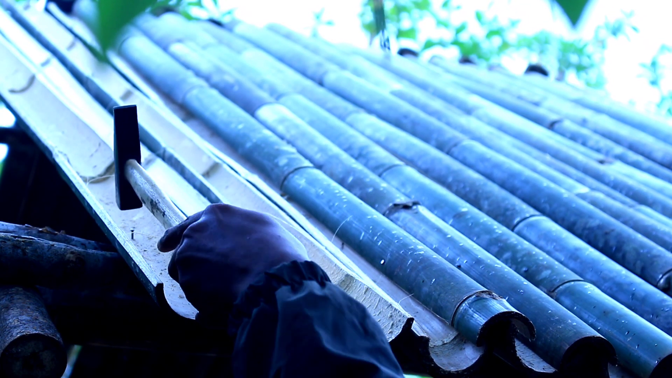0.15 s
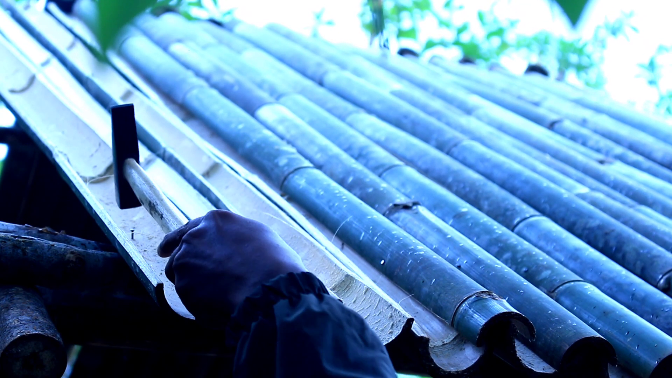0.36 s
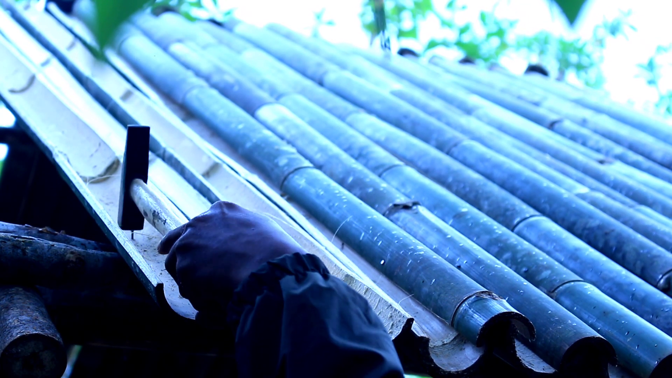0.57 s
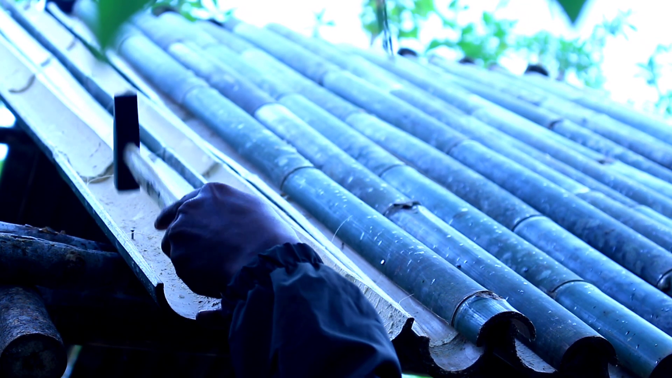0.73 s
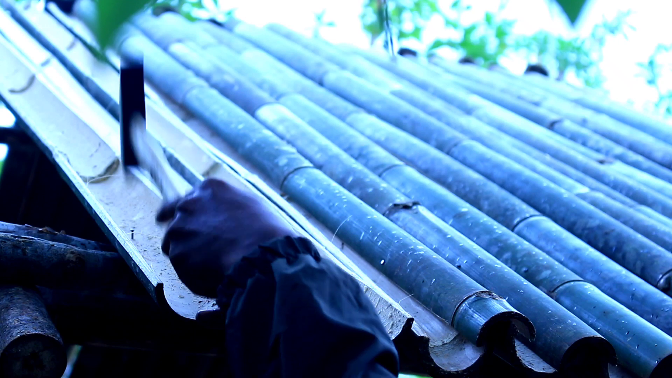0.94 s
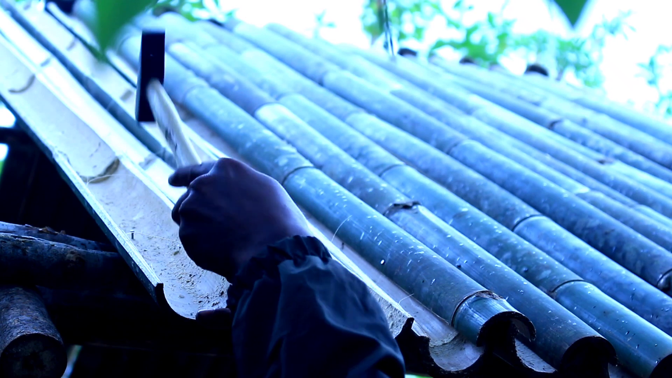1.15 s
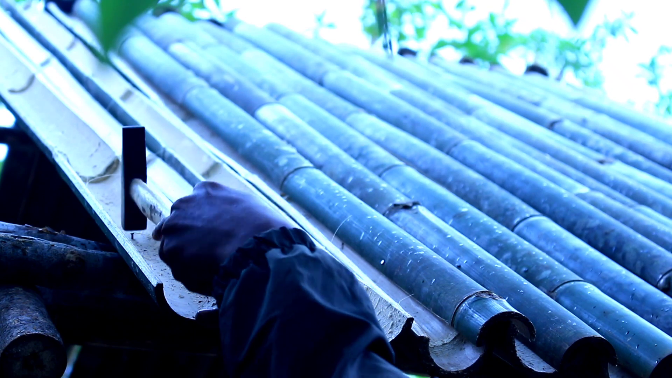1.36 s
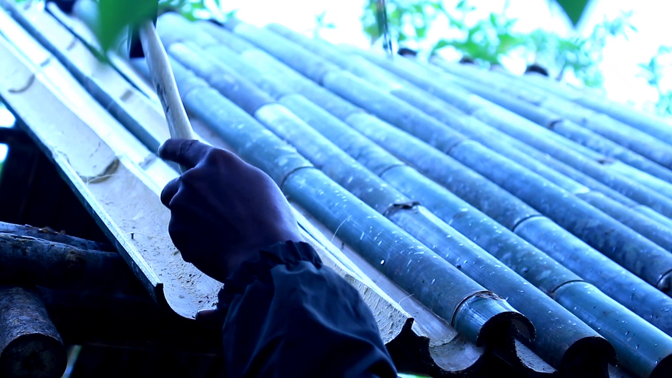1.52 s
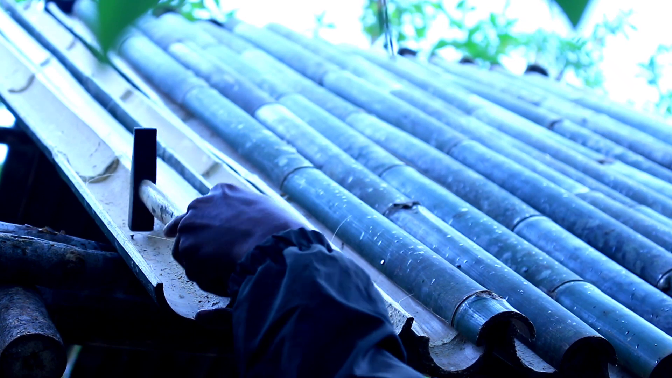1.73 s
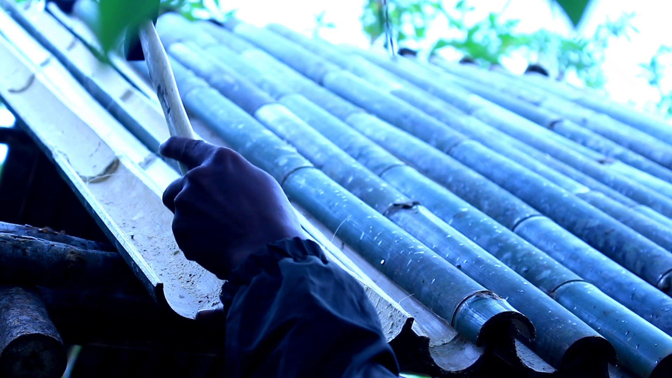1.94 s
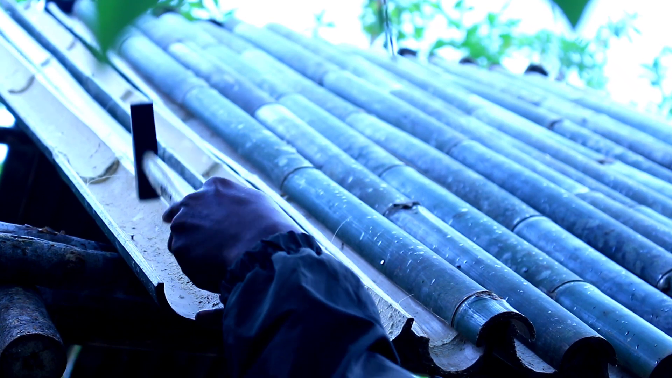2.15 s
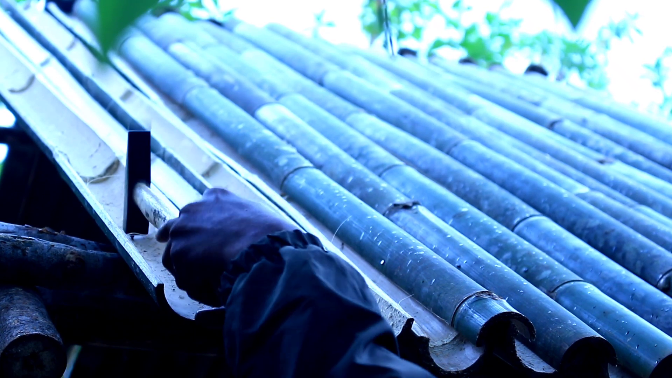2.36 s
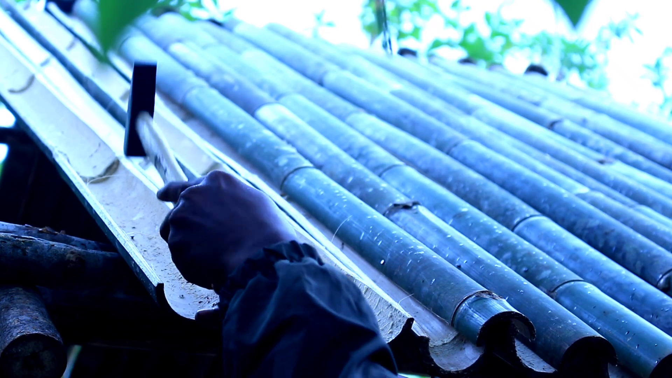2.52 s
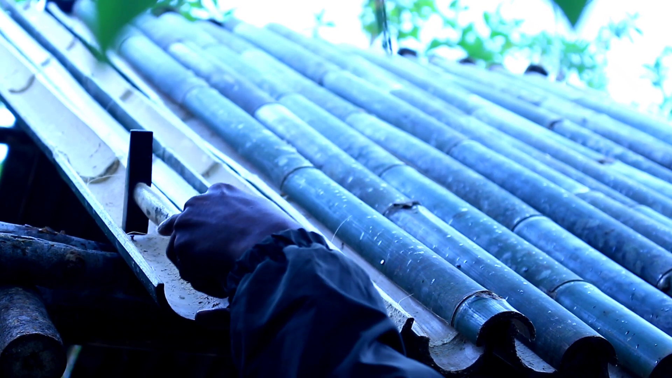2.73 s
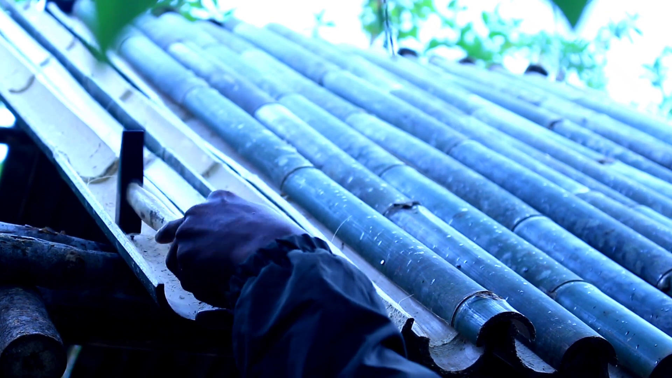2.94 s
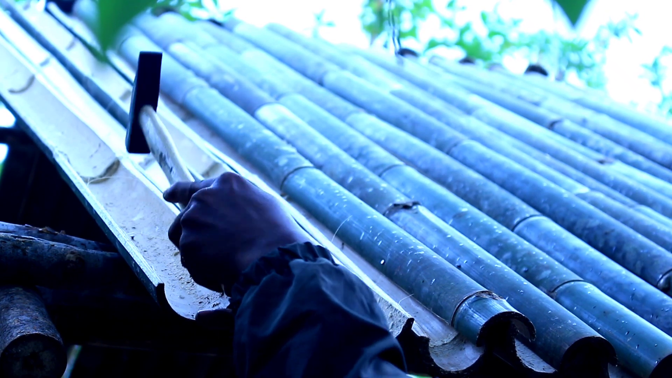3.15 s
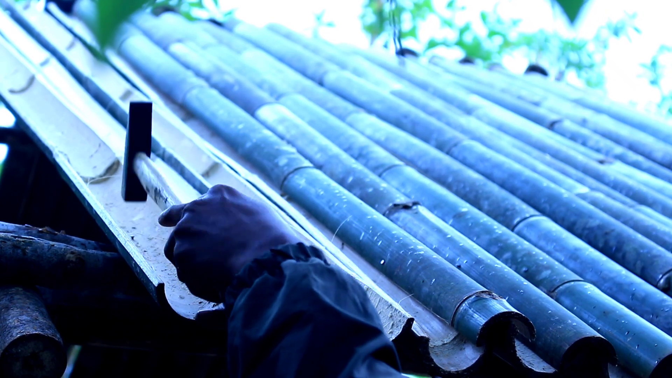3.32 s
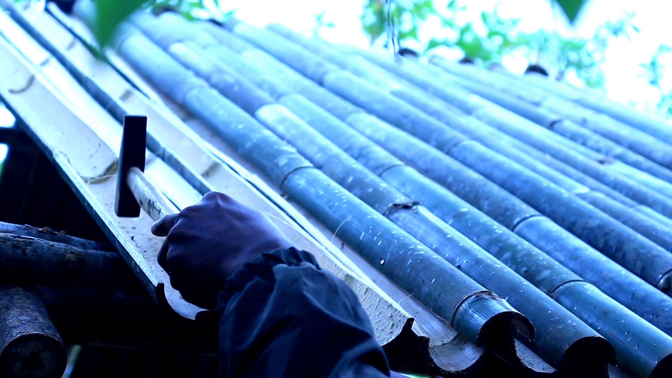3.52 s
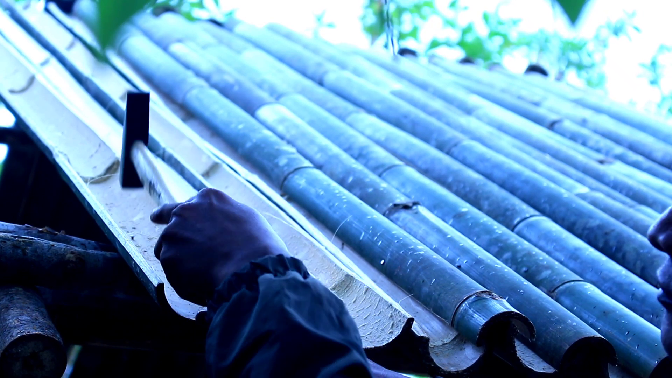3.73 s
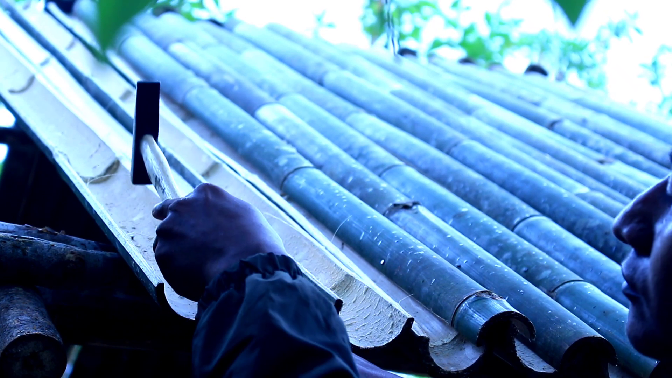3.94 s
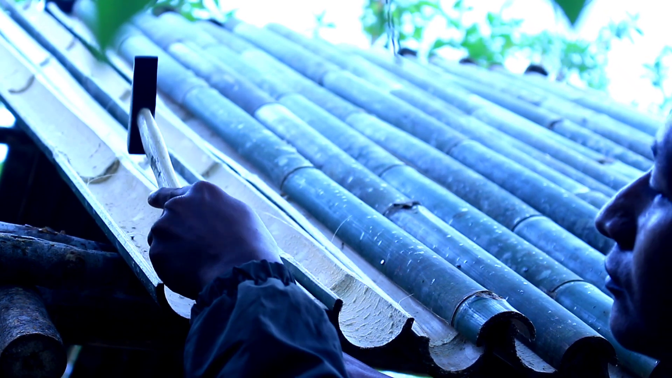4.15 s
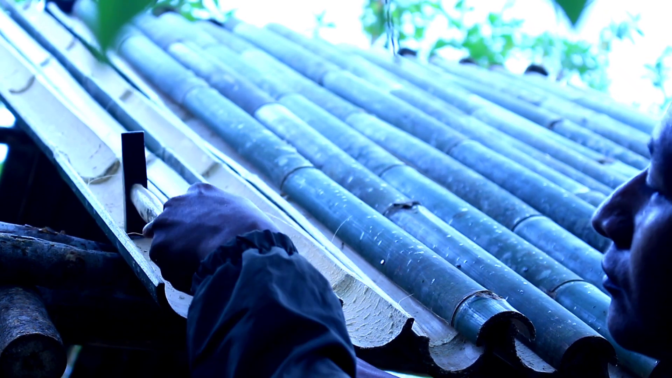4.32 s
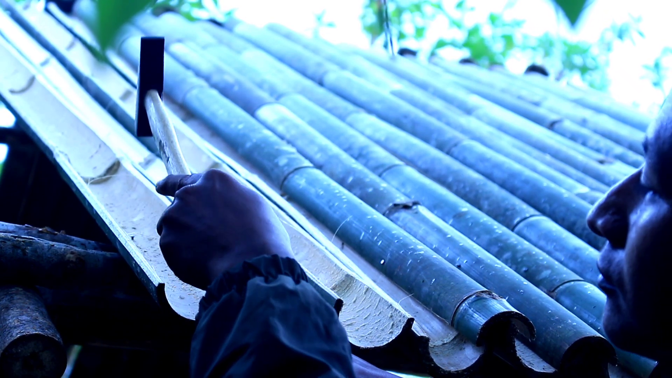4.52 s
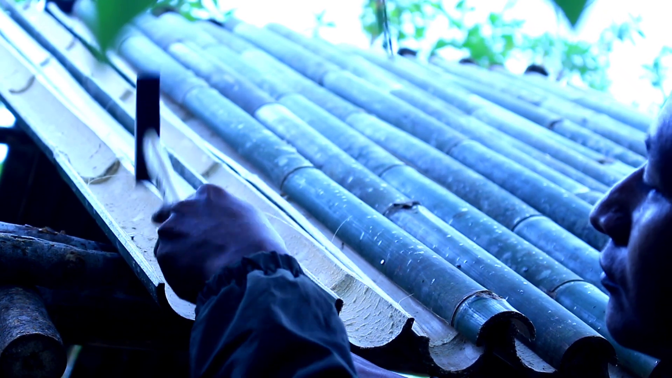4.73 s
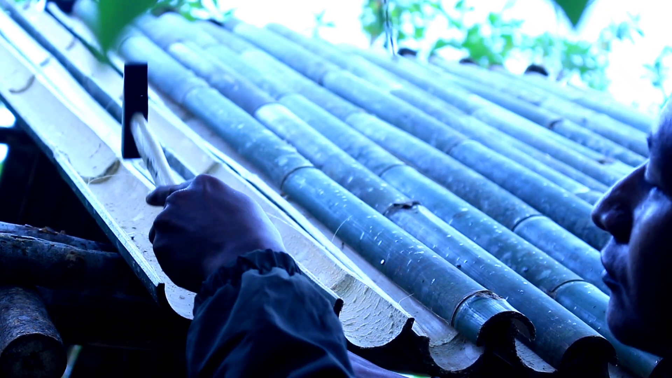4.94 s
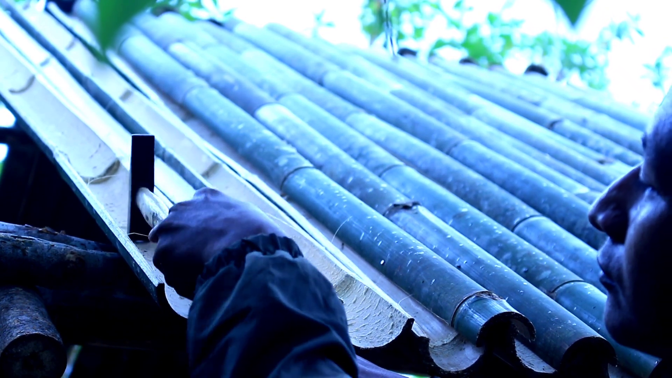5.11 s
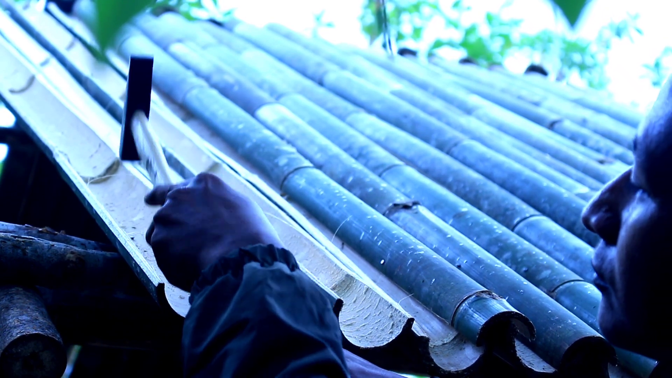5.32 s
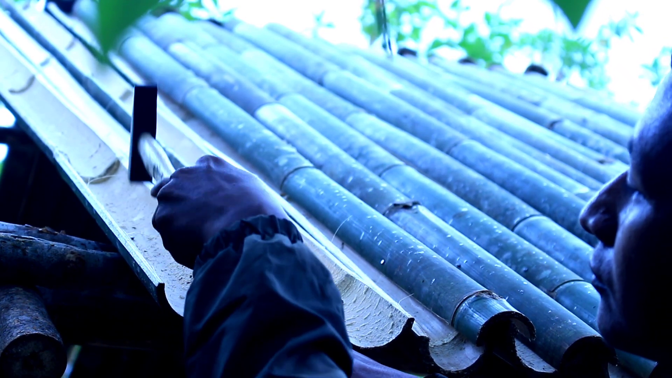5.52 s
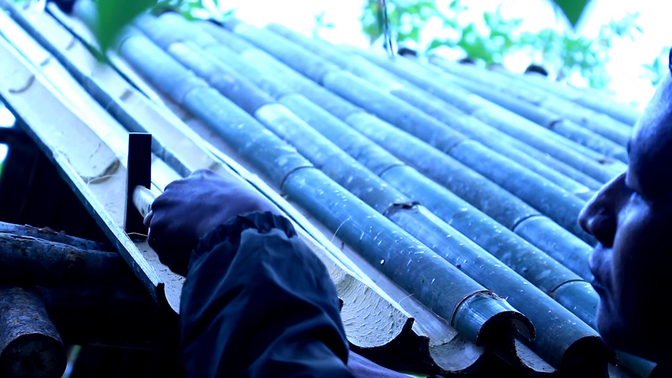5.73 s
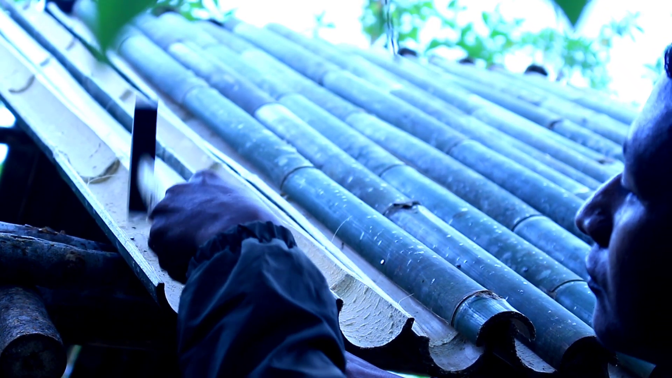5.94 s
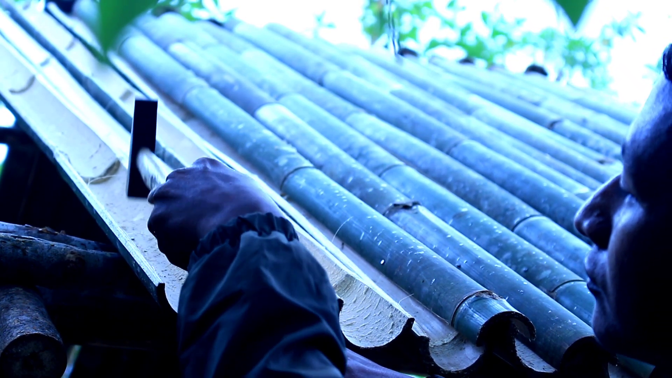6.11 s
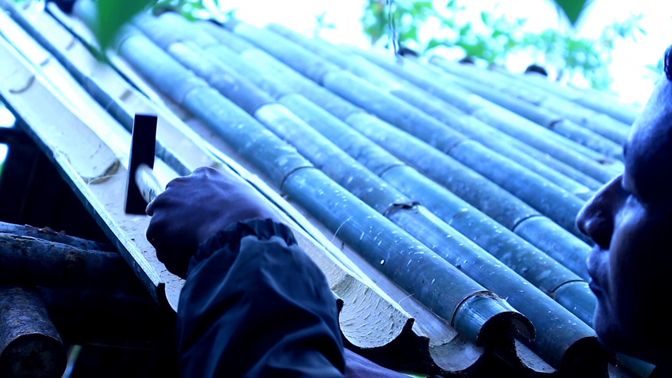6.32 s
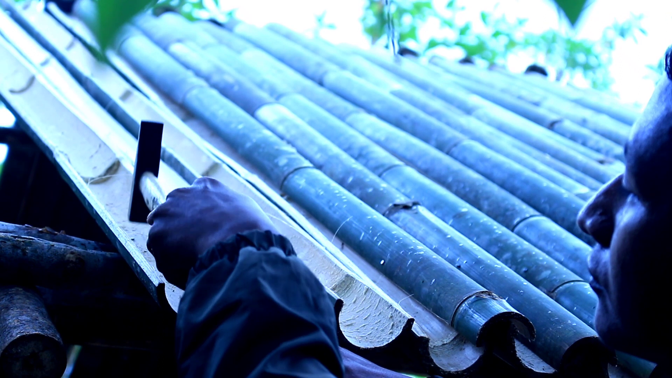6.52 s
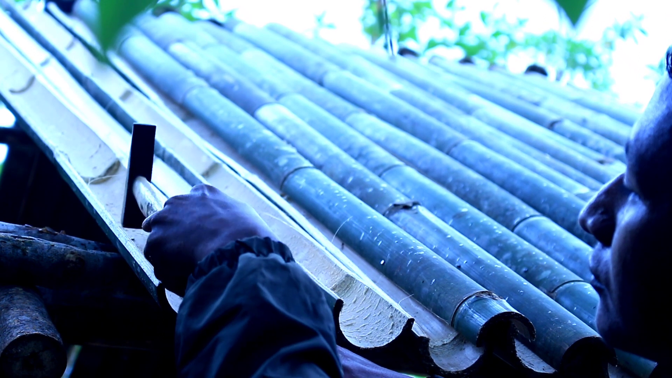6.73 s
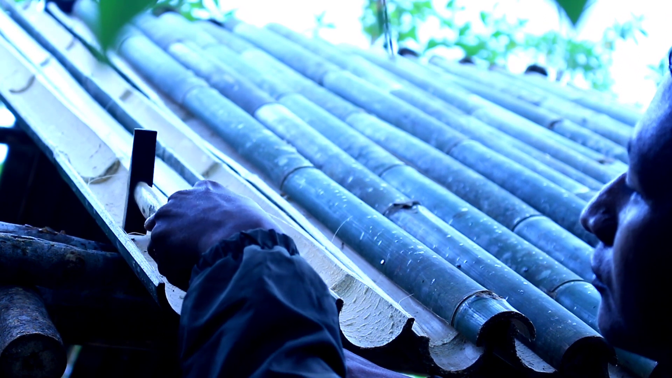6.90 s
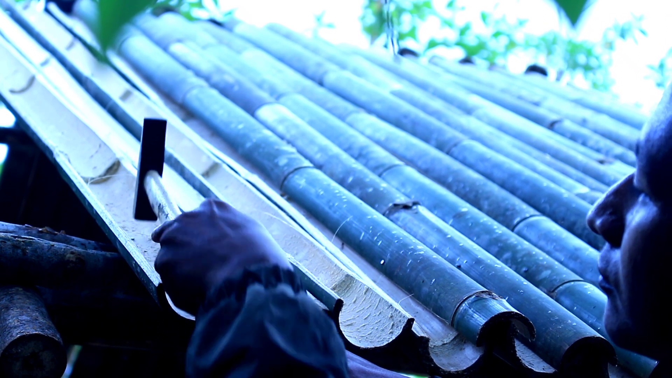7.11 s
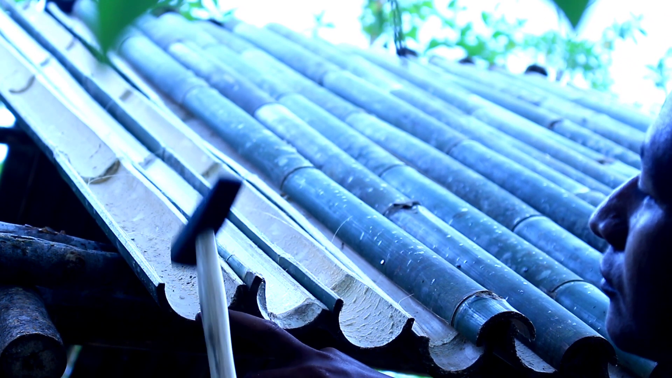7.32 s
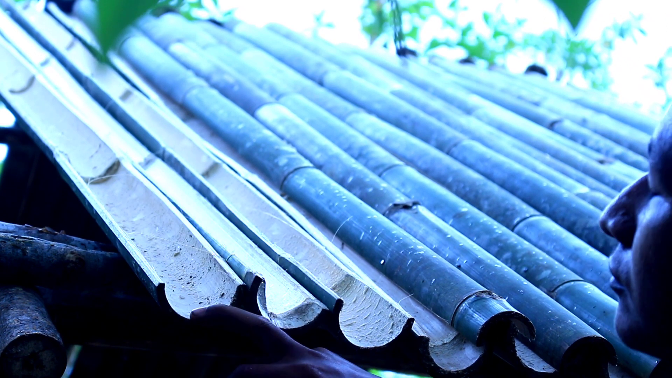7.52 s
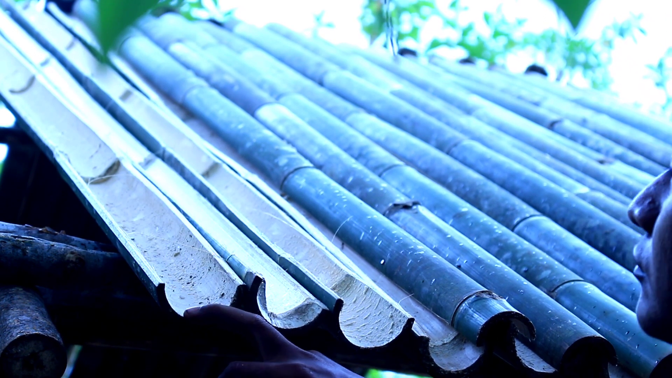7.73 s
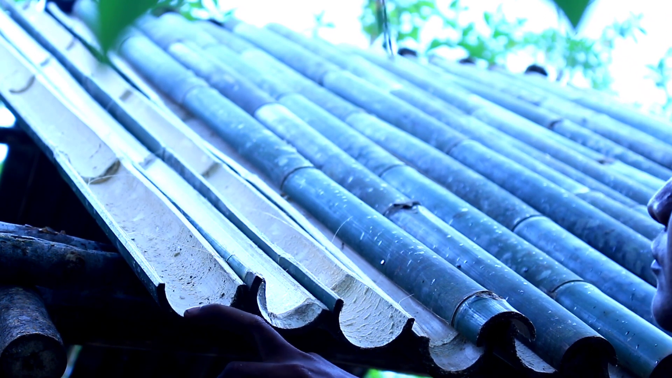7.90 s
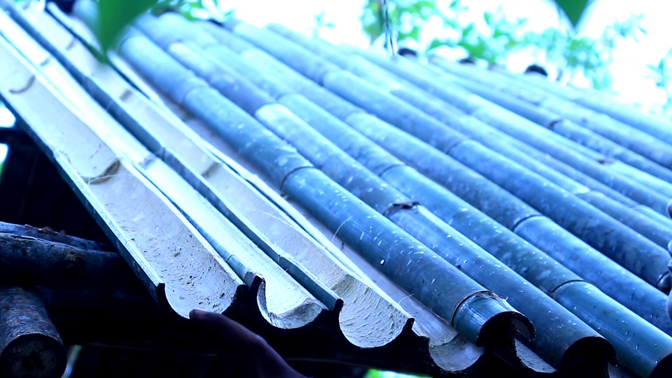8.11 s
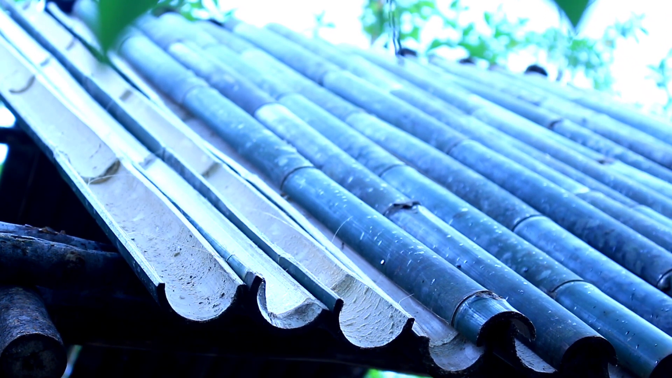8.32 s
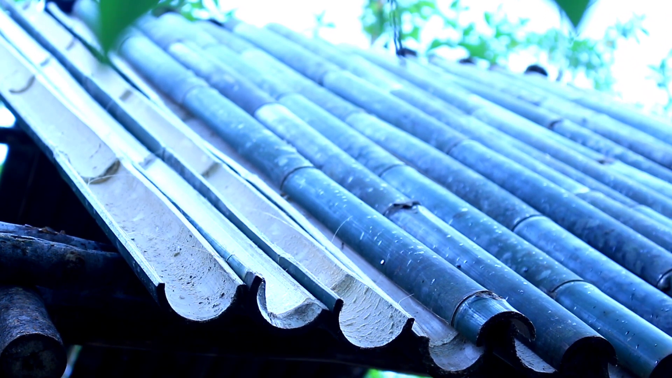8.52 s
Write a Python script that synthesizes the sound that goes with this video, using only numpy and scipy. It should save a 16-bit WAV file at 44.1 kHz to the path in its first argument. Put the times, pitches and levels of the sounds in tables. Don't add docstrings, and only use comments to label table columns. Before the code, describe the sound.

Close hammering on loose bamboo canes, dry woody cracks with bright steel ticks, uneven pauses and one rattle, then quiet with a thin cricket rasp.

```python
import sys
import numpy as np
from scipy import signal
from scipy.fft import rfft, irfft, next_fast_len
from scipy.io import wavfile
from scipy.ndimage import uniform_filter1d

SR = 44100
rng = np.random.default_rng(int(sys.argv[2]) if len(sys.argv) > 2 else 0)


def generate_wav(sig):
    pcm = np.round(np.clip(np.atleast_2d(sig).T, -1, 1) * 32767).astype(np.int16)
    wavfile.write(sys.argv[1], SR, pcm)


def natural_amplitude(level_db):
    exponent = np.asarray(level_db, float) / 20
    return 10 ** exponent


N = 381906

# pitch_hz, then loudness for each kind of
# blow (nail_db, flush_db, hard_db, cane_db, glancing_db), then t60_s, the time to fade by 60 dB
CANE_MODES = [(129, -12.5, -33.5, -21.5, -29.5, -12, 0.083), (283, -2, -6.5, -6, -12.5, -3, 0.049),
              (439, -1.5, -23.5, -5, -10.5, -4.5, 0.15), (644, 0, 10, 2, -0.5, 2.5, 0.054),
              (850, 1, 7, -2.5, -1, 3, 0.082), (930, 4.5, 4.5, -3.5, -2.5, 0, 0.079),
              (1097, -9, -3.5, -5.5, -2.5, -5, 0.049), (1232, -12, -15, -10.5, -8, -6, 0.094),
             (1370, -12, -8, -6.5, -9, -9, 0.14), (1532, 2, 1.5, 5.5, 3.5, 6.5, 0.033),
             (1641, -12.5, -3.5, -19, -17, -0.5, 0.038), (1779, 1.5, 1, 1.5, 0.5, 0, 0.035),
             (1930, 1.5, 2, -6, 0, -1.5, 0.066), (1938, 7.5, -2, 4.5, 5.5, -0.5, 0.036),
             (2107, -2.5, 4, -3.5, -5, -5, 0.036), (2209, 5.5, 3.5, 17.5, 7, 2.5, 0.013),
             (2445, 0.5, 2.5, -8.5, -6, 7, 0.019), (2624, -2.5, 4, 11, -1, -12, 0.015),
             (2890, -4.5, -10, -48, -20, -12, 0.025), (3170, -14, -25, -17, -24, -21, 0.033)]
CANE = np.array(CANE_MODES)
TOP_HZ = 15350


def hammering(lead):
    # start_s, strength_db, depth_db (low canes over high), bite_db (how squarely steel is met)
    on_nail = [
        (-.16, -12, -5, 0),
        (1.0339, -14, -6, -2),
        (1.384, -14, -5.5, -1),
        (1.7426, -13.5, -6.5, -2),
        (2.4544, -12, -7.5, -5),
    ]
    flush = [
        (3.0153, -14, -2, 4),
        (3.2675, -11.5, -4, -1.5),
        (5.4528, -10.5, -4.5, -0.5),
        (6.2862, -9.5, -7, -6),
        (6.4986, -8, -10, -6),
    ]
    hard = [
        (4.8433, -13.5, -4.5, -1),
        (5.1528, -14, -4.5, 2),
        (5.7474, -13, -7.5, 0),
        (6.0257, -12, -5.5, -1.5),
    ]
    on_cane = [
        (.6537, -22, -7.5, -2.7),
        (4.3634, -16, -0.5, 3),
        (6.996, -15, -12, -2),
    ]
    glancing = [
        (2.0938, -15.5, -4.5, 7.3),
        (2.7397, -15.5, -5, 6),
        (3.4914, -23.5, 1.8, 2.5),
        (3.6674, -27.5, -1, -0.5),
        (6.682, -24.5, -5.5, 3.5),
        (6.8525, -37, 2, 6),
    ]
    bounces = [
        (2.7474, -16, 0, 6),
        (3.5034, -23, -24, 8.5),
        (3.6774, -38, 11, 17),
        (6.6904, -26.5, -6, 3.5),
        (6.7114, -22.5, -8, -17),
        (6.8734, -25, -5.5, -3),
    ]
    # start_s, strength_db
    rattle_slaps = [
        (2.102, -34.5),
        (2.1134, -28),
        (2.1344, -29),
        (2.1504, -20.5),
        (2.1615, -24.5),
        (2.1784, -23.5),
        (2.2212, -35.5),
        (2.2658, -38.5),
        (2.317, -47.5),
    ]
    # start_s, strength_db, bite_db
    laid_aside = [
        (7.6618, -58, 4),
        (7.805, -56, 2),
        (7.895, -60, -4.5),
        (8.21, -63.5, 13.5),
    ]
    # tick_db, tick_db per bite_db, treble_db, treble_db per bite_db, clatter_s
    laws = [
        (10, 0.64, 0.2, 1.5, .0078),
        (3.5, 1.06, -14.5, 1.01, 0.0058),
        (7.5, -0.03, -3.5, 1.6, 0.0084),
        (-1.5, 2, -21, 1, 0.0084),
        (-0.5, 1, -31.5, 2.1, 0.0082),
        (-3.3, 1.3, -30, 0.86, 0.0052),
        (-6, 2.2, -30, -0.1, 0.0032),
        (.1, 1.16, -10.5, 0.45, .005),
    ]
    # pitch_hz, level_db, t60_s
    tick = [(2200, -3, 0.0092), (2750, 2, .004), (3200, 15, 0.0047), (3766, 6, 0.017), (3870, 7, 0.021),
            (4700, -10, .004)]
    # pitch_hz, level_db, t60_s
    seated = [(2314, 0, 0.0096), (3120, 3.5, 0.0039), (3870, 9, 0.004), (4280, -7.5, 0.008),
              (5370, 1.5, 0.0067)]
    # pitch_hz, level_db, t60_s
    driven = [(2174, 11.5, 0.0086), (2490, 9, .007), (3000, -1.5, 0.012), (3785, 6, 0.018),
              (4120, 10, 0.01), (4350, -20, 0.0023)]
    # pitch_hz, level_db, t60_s
    crack = [(2240, -2.5, 0.0026), (2770, -4, 0.0028), (3560, -6, 0.0037), (4170, -11, 0.0068),
             (5180, -18, 0.0081)]
    # pitch_hz, level_db, t60_s
    scuff = [(2900, -5, .006), (3420, -1, 0.0093), (3900, 0, .006), (4400, -3, .005)]

    dulls_db_per_s = 237
    first_s = rattle_slaps[0][0]
    rattle = [(s, db, -3.2, 13 - dulls_db_per_s * (s - first_s)) for s, db in rattle_slaps]
    handling = [(s, db, -3, bite_db) for s, db, bite_db in laid_aside]
    nail_db, flush_db, hard_db, cane_db, glance_db = CANE.T[1:-1]
    # echo_db, skid_db, sizzle_db, head_db
    kinds = (
        (on_nail, nail_db, tick, -12, .35, .00012, -9, -20, -30, -27),
        (flush, flush_db, seated, -12, .6, .00015, -9, -16, -22, -27),
        (hard, hard_db, driven, -12, .5, .00012, -9, -20, -20, -27),
        (on_cane, cane_db, seated, -11, .8, .00025, -9, -10, -22, -34),
        (glancing, glance_db, crack, -9, 1.5, .00025, -9, -7, -24, -42),
        (bounces, glance_db, crack, -14, 1.5, .00025, -11, -8, -26, -45),
        (rattle, glance_db, crack, -18, 1.5, .00022, -13, -10, -26, -45),
        (handling, glance_db, scuff, -14, 1.5, .00025, -11, -8, -26, -45))
    left_right_db = np.array([[2.4], [-2.6]])
    out = np.zeros((2, lead + N + SR))
    for (events, mode_db, contact, clatter_db, fresh, contact_s, echo_db, *steel_db), law in zip(kinds, laws):
        habit = slaps()
        for event in events:
            row = layers(event, law)
            push = force(row[-1], clatter_db, habit, fresh, contact_s)
            chatter = habit[::-1] + fresh * slaps()
            knock = blow(row, mode_db, push, contact, chatter, contact_s, *steel_db)
            echo = yard(row) * natural_amplitude(echo_db)
            start = lead + int(row[0] * SR)
            out[:, start:start + len(knock)] += knock * natural_amplitude(left_right_db)
            out[:, start:start + echo.shape[1]] += echo
    return out[:, lead:lead + N]


def layers(event, law):
    s, strength_db, depth_db, bite_db = event
    tick_db, tick_slope, treble_db, treble_slope, clatter_s = law
    tick_db = strength_db + tick_db + tick_slope * bite_db
    treble_db = strength_db + treble_db + treble_slope * bite_db
    return s, tick_db, strength_db + depth_db, strength_db, treble_db, clatter_s


def blow(row, cane_db, push, contact, chatter, contact_s, skid_db, sizzle_db, head_db):
    # pitch_hz, level_db, t60_s
    treble = [(5580, 4.5, 0.0062), (5900, 0.8, .007), (7170, 3.5, 0.0077), (8760, -0.5, 0.0096),
              (9400, 7, 0.0046), (10400, -14, 0.041), (13000, -30.5, .0048)]
    # pitch_hz, level_db, t60_s
    sizzle = [(15000, -0.5, .008), (16140, -1.5, .006)]
    # pitch_hz, level_db, t60_s
    head = [(3130, -6, .24), (3240, 1.5, .36), (3283, -6, .3), (3358, -3, .28), (3980, -10, .27),
            (4145, -9, .25)]

    _, tick_db, low_db, high_db, treble_db, _ = row
    hz, t60 = CANE[:, 0], CANE[:, -1]
    phase = np.pi * np.arange(len(hz))
    chance = rng.standard_normal((2, len(hz)))
    hz = hz * (1 + 0.0039 * chance[0])
    db = cane_db + 0.32 * chance[1]
    damping = .72
    low = hz < 1000
    out = 0
    for part, level_db, rise_s in ((low, low_db - 2.5, .001), (~low, high_db - 6.0, .0015)):
        modes = ring(hz[part], db[part], damping * t60[part], phase[part], rise_s)
        out = out + natural_amplitude(level_db) * unit(signal.fftconvolve(modes, push)[:len(modes)])

    skid = natural_amplitude(skid_db) * chatter * np.exp(-np.arange(SR // 8) / SR / 0.014)
    skid[0] = 1
    skid[int(.00127 * SR)] = natural_amplitude(-10.5)
    out = out + steel(contact, tick_db - 7.5, soften(skid, contact_s))
    out = out + steel(treble, treble_db - 4.0, skid)
    out = out + steel(sizzle, treble_db + sizzle_db - 2.0, skid)
    head_phase = 2 * np.pi * rng.random(len(head))
    out = out + natural_amplitude(tick_db + head_db - 3.5) * ring(*np.transpose(head), head_phase, .0016)
    return signal.sosfilt(signal.butter(2, 140, "high", fs=SR, output="sos"), out)


def force(clatter_s, clatter_db, habit, fresh, contact_s):
    # delay_s, level_db
    pole_slaps = [
        (.0072, 0.5),
        (0.0109, -4),
    ]
    t = np.arange(len(habit)) / SR
    length = np.clip(clatter_s, .002, .06)
    swell = t / length * np.exp(1 - t / length)
    out = (habit + fresh * slaps()) * natural_amplitude(clatter_db) * swell
    out[0] += .9
    for delay_s, db in pole_slaps:
        out[int(delay_s * SR)] -= natural_amplitude(db + .5 * clatter_db + 2.5)
    return soften(out, contact_s)


def soften(push, contact_s):
    return np.convolve(push, np.hanning(3 + int(max(contact_s, 0) * SR)))


def slaps():
    chance = rng.random((2, SR // 8))
    return (chance[0] < .1) * (2 * chance[1] - 1) * 0.8


def steel(table, level_db, push):
    hz, db, t60 = np.transpose(table)
    chance = rng.standard_normal((2, len(hz)))
    modes = ring(hz * (1 + .003 * chance[0]), db + .6 * chance[1], t60, 0, .0001)
    return natural_amplitude(level_db) * unit(signal.fftconvolve(modes, push)[:len(modes)])


def ring(hz, db, t60, phase, rise_s):
    click = np.arange(SR // 3) == 0
    poles = np.exp((2j * np.pi * hz - np.log(1000) / np.clip(t60, .003, .6)) / SR)
    gains = natural_amplitude(db) * np.exp(1j * phase)
    modes = sum(signal.lfilter([g], [1, -p], click).imag for g, p in zip(gains, poles))
    return modes * (1 - np.exp(-np.arange(SR // 3) / SR / max(rise_s, 1e-5)))


def unit(x):
    return x / np.sqrt(uniform_filter1d(x ** 2, size=220).max())


def yard(row):
    # pitch_hz, level_db, t60_s, likeness of left and right (-1 to 1)
    echo_bands = [(111, -20, 0.8, -0.047), (270, -17.5, 0.66, 0.43), (510, 2.5, 0.26, 0.76),
                  (1070, -4.5, 0.36, 0.72), (1935, -7.5, 0.47, 0.44), (3410, 2.5, 0.3, 0.56),
                  (4700, -6, 0.52, 0.5), (7800, 4, 0.39, -0.085), (10000, -9, 0.21, 0.25),
                  (13500, -30.5, 0.14, .05)]
    _, tick_db, low_db, high_db, treble_db, clatter_s = row
    colour = reading([(550, low_db), (1600, high_db), (3600, tick_db - 14.0), (7500, treble_db - 9.5)])
    t = np.arange(2 ** 14 * 3 // 2) / SR
    f = np.maximum(np.fft.rfftfreq(len(t), 1 / SR), 10)
    uneven = np.repeat(rng.standard_normal(len(t) // 256), 256)
    patches = natural_amplitude(1 * uniform_filter1d(uneven, size=256))
    noise = rfft(rng.standard_normal((2, len(t))) * patches) * (f < TOP_HZ)
    noise = noise * natural_amplitude(-6 / (1 + (11800 / f) ** 24))
    out = 0
    for hz, db, t60, alike in echo_bands:
        band = natural_amplitude(-16 * np.log2(f / hz) ** 2)
        mid, side = irfft(noise * band, len(t)) * np.sqrt(SR / 4 / hz)
        alike = np.clip(alike, -.95, .95)
        mid, side = mid * np.sqrt(1 + alike), side * np.sqrt(1 - alike)
        lean_db = np.clip(.45 * np.log2(hz / 600), -1.5, 1.6) * np.array([[1], [-1]])
        fade = np.exp(-np.log(1000) * t / max(t60, .05))
        out = out + natural_amplitude(db + colour(hz)) * fade * np.array([mid + side, mid - side]) * natural_amplitude(lean_db)
    build_up = 1 - np.exp(-t / (0.00035 + 0.034 * clatter_s))
    return out * build_up * natural_amplitude(np.array([[-2.1], [-4.1]]))


def reading(table):
    hz, value = np.transpose(table)
    return lambda f: np.interp(np.log(f), np.log(hz), value)


def coloured(db_at, size):
    fast = next_fast_len(size)
    hz = np.maximum(np.fft.rfftfreq(fast, 1 / SR), 10)
    return irfft(rfft(rng.standard_normal(fast)) * natural_amplitude(db_at(hz)), fast)[:size]


def walk(rate):
    k = int(SR / rate)
    steps = np.repeat(rng.standard_normal(N // k + 1), k)
    return 0.34 * uniform_filter1d(uniform_filter1d(steps, k), k)[:N]


def cricket():
    # middle_s, half_length_s, drop_db; level_db below starts from the song at full strength
    rests = [(4.4, .2, 16), (7.4, 0.27, 4.8)]
    t = np.arange(N) / SR
    throb = 1 + 0.55 * np.sin(2 * np.pi * 38 * t + .8 * walk(2.7))
    rasp = np.array([coloured(lambda f: -np.abs(f - 5900) / 40, N) for _ in range(2)])
    high = np.array([coloured(lambda f: -np.abs(f - 10100) / 50, N) for _ in range(2)])
    level_db = -71.5 - sum(db * np.exp(-((t - s) / half) ** 4) for s, half, db in rests)
    return natural_amplitude(level_db) * throb * rasp / rasp.std() + natural_amplitude(-80.5) * high / high.std()


def site():
    # pitch_hz, level_db
    noise_colour = [(15, -71.5), (25, -24), (112, -5), (237, -3.5), (427, -4.5), (900, -7.5), (2020, -10),
                    (15000, -25)]
    # pitch_hz, side minus mid in dB
    width = [(60, 7), (110, 7.5), (200, 6), (380, 6), (1290, 4.5), (4400, 2), (8120, 1), (15000, -0.5)]
    mid_db, wider_db = reading(noise_colour), reading(width)
    mid = coloured(lambda f: mid_db(f) - 30 * (f > TOP_HZ), N)
    side = coloured(lambda f: mid_db(f) + wider_db(f) - 30 * (f > TOP_HZ), N)
    gain = natural_amplitude(-60 + 0.2 * walk(1.4) + 0.64 * walk(30)) / mid.std()
    return gain * np.array([natural_amplitude(-1.14) * (mid + side), natural_amplitude(-1.53) * (mid - side)])


def scene():
    return hammering(SR // 4) + cricket() + site()


def roll_off(x):
    return signal.sosfilt(signal.butter(12, 17030, fs=SR, output="sos"), x)


def record(dry):
    rounded = np.clip(np.tanh(1.1 * dry) / np.tanh(1.1), -1, 1)
    top_cut = signal.sosfilt(signal.ellip(8, .2, 70, 16400, fs=SR, output="sos"), rounded)
    return roll_off(top_cut)


dry = scene()
out = record(dry)
generate_wav(out)
```